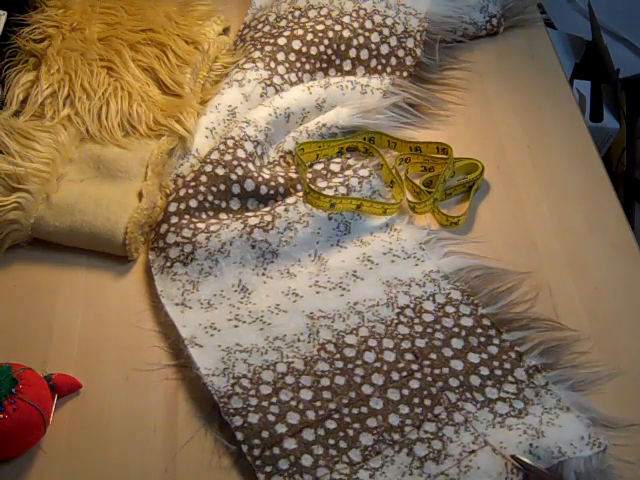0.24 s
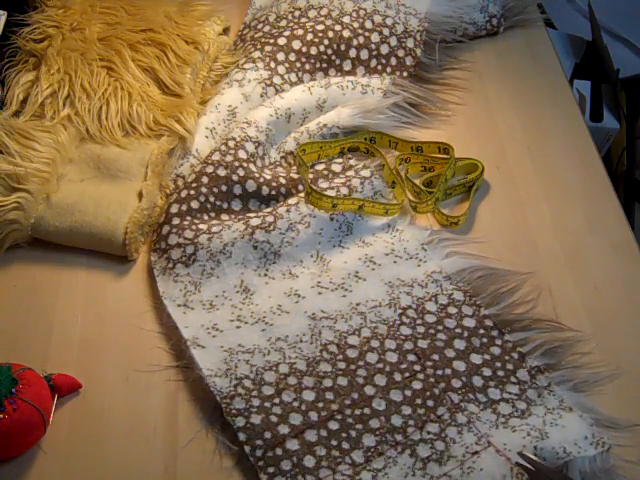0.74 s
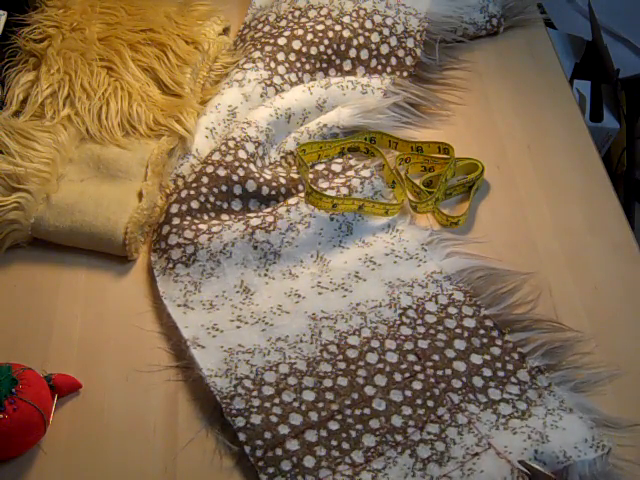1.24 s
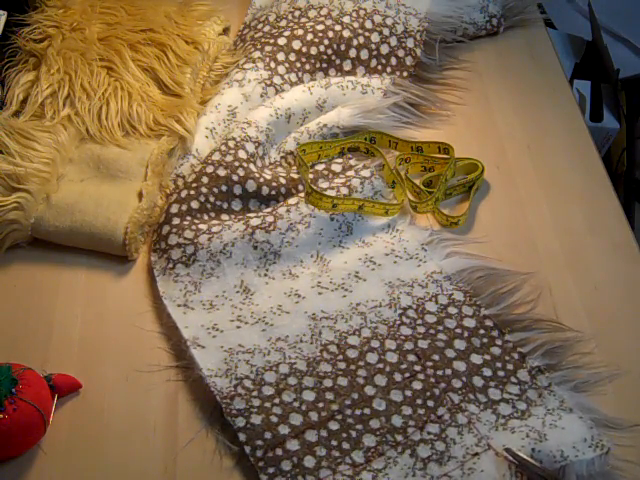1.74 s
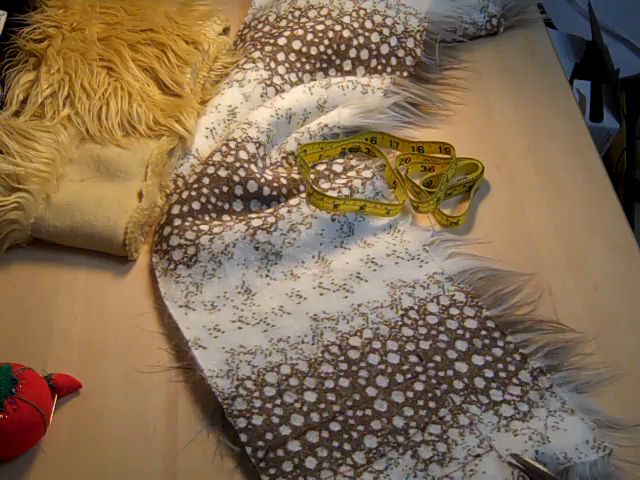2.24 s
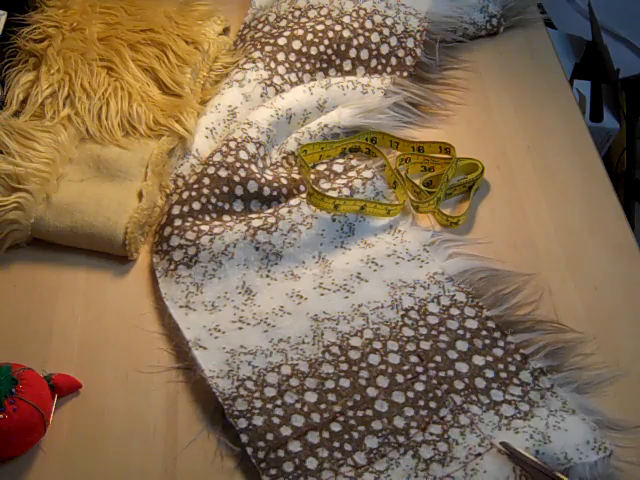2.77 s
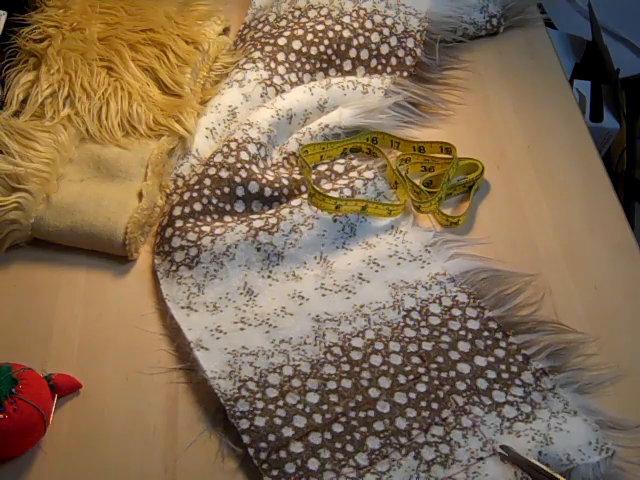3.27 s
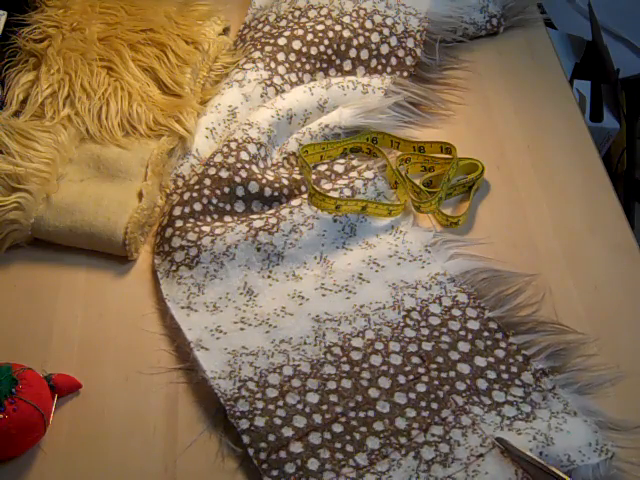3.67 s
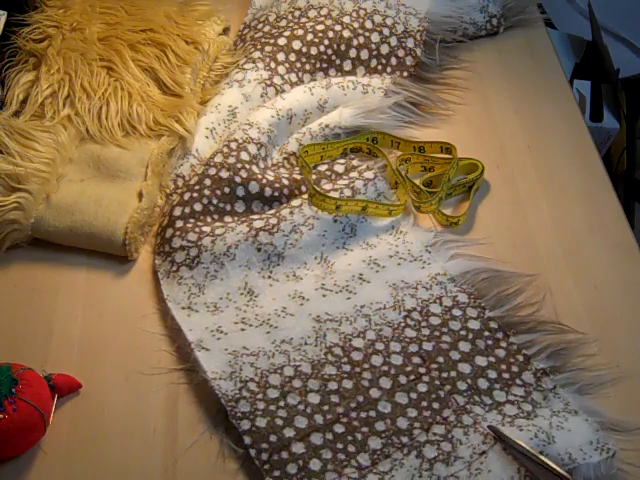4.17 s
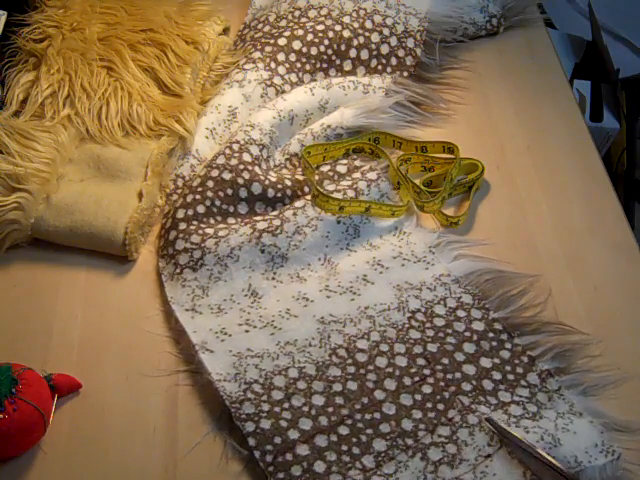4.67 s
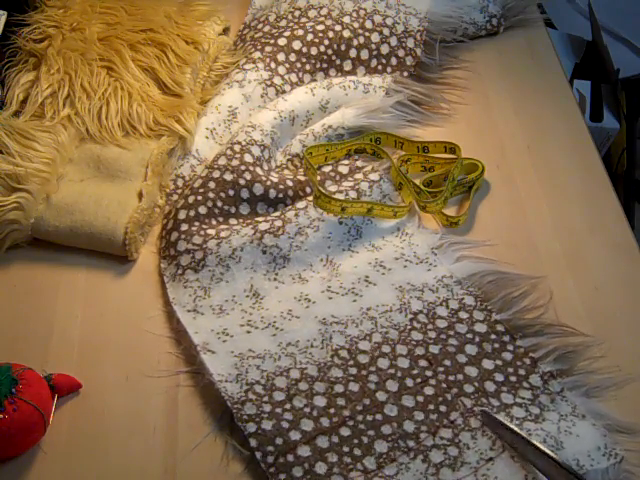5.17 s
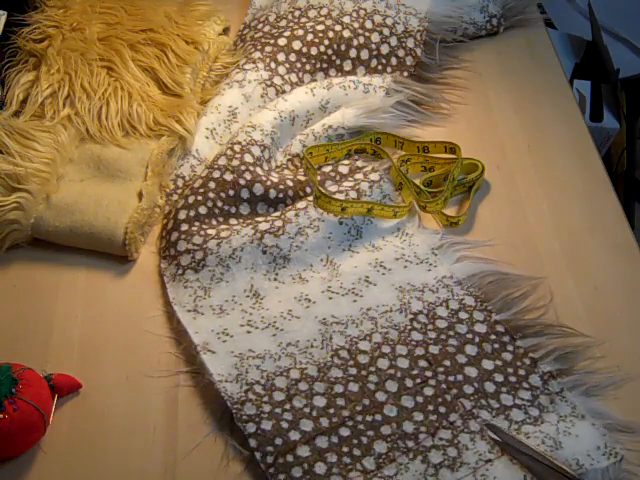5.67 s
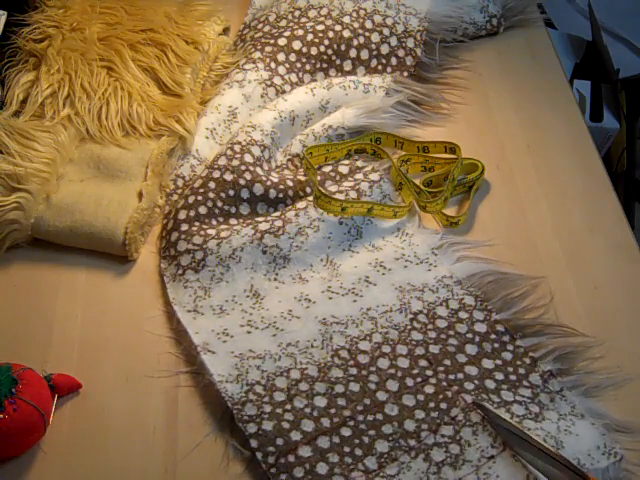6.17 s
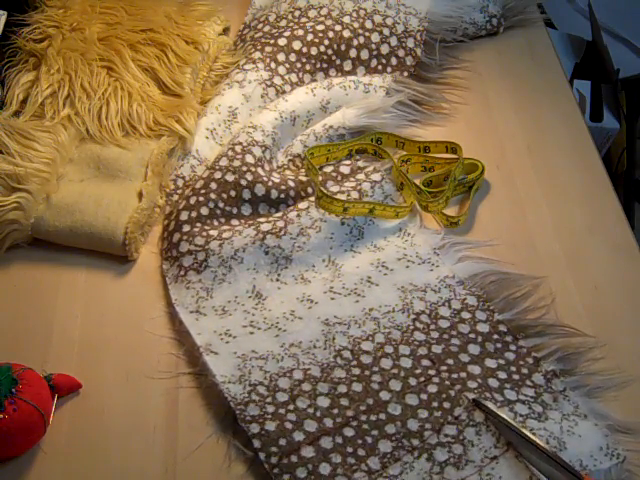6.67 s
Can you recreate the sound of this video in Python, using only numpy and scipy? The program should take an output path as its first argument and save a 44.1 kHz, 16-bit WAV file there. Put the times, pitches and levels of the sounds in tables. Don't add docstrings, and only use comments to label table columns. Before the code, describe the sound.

Scissors snip unhurriedly through thick furry fabric on a worktable, crisp bites and hard metallic closing clicks over a faint low fan hum.

```python
import sys
import numpy as np
from scipy import signal
from scipy.fft import rfft, irfft, next_fast_len
from scipy.io import wavfile
from scipy.ndimage import uniform_filter1d

SR = 44100
rng = np.random.default_rng(int(sys.argv[2]) if len(sys.argv) > 2 else 0)


def persist_wave(psi):
    counts = np.round(np.clip(psi, -1, 1) * 32767).astype(np.int16)
    wavfile.write(sys.argv[1], SR, np.atleast_2d(counts).T)


def amplitude_ratio(level_db):
    exponent = np.asarray(level_db, float) / 20
    return 10 ** exponent


N = 304686
PAD = next_fast_len(N + SR // 2)
HZ = np.maximum(np.arange(PAD // 2 + 1) * SR / PAD, 1)

# pitch_hz, rms_db, left_re_right_db
FAN_LINES = [(55, -64.5, -1), (72.7, -56, -0.5), (115.9, -60.5, 0.5), (119.1, -66.5, 3.5), (465.9, -60, -1)]
# pitch_hz, width_hz, level_db
ROOM_MODES = [(32, 23, -10.5), (101, 30, -10.5), (174, 13, -1.5), (204.4, 16, 0), (226, 17, -2.5),
              (308, 33, -2), (431.5, 41, -4.5), (460.7, 11, -0.5), (496, 23, -4), (560, 20, -20.5)]
# frequency_hz, density_db
RUMBLE_SPECTRUM = [(20, -42.5), (60, -7), (210, -9.5), (255, -15.5), (320, -8), (750, -15), (9000, -38.5),
                   (11700, -72)]
# frequency_hz, correlation
PORT_LIKENESS = [(60, 0.42), (180, 0.85), (540, 0.87), (1630, 0.083), (4890, 0.49), (14700, -0.04)]
# frequency_hz, left_re_right_db
PORT_TILT = [(60, 4.5), (180, 0), (540, 1), (1630, 2.5), (4890, 5.5), (14700, 2.5)]
RUMBLE_DB, ROOM_MODES_DB, AIR_DB, HISS_DB = -53.5, -47, -75.5, -64
# pitch_hz, width_hz, rms_db
WHINES = [(4800, 100, -79), (7960, 49, -80)]

# frequency_hz, t60_s
ROOM_T60 = [(1000, 0.17), (2700, 0.27), (4200, 0.2), (6500, 0.31), (9500, 0.18), (14000, 0.45)]
ROOM_GAP_S, ROOM_RISE_S = 0.0048, 0.0014
MOVES_S = [0, 1.3, 2.8, 4.0, 4.45, 4.95, 6.0, 7]
# peak_hz, peak_width_hz, dip_hz, dip_width_hz
LEFT_PORT = (7850, 900, 6500, 2380)
RIGHT_PORT = (6220, 972, 12500, 8600)
# peak_hz, peak_width_hz, dip_hz, dip_width_hz
LEFT_AROUND = (8270, 1803, 5470, 5910)
RIGHT_AROUND = (6220, 930, 13000, 9000)
LEFT_LAG_S, LEFT_LAG_AROUND_S = 7e-5, 6e-5

# centre_s, length_ms, level_db
PUSHES = [(.24, 170, -68.5), (.455, 23, -63), (1.68, 60, -75.5), (1.955, 52, -64.5), (2.45, 37, -73.5),
          (2.955, 110, -64.5), (3.175, 20, -69), (3.625, 34, -65), (3.86, 130, -70), (4.10, 99, -64),
          (4.87, 130, -67.5), (5.80, 30, -71.5), (6.36, 180, -62.5)]
FUR_REST_DB = -71.5
# pitch_hz, width_hz, level_db
FUR_MODES = [(3460, 1800, -1), (7200, 1800, -2), (12000, 4300, -16)]
# start_s, level_db, pitch_hz, decay_ms
KNOCKS = [
    (.5975, -40, 1100, 3),
    (0.765, -52, 1400, 12),
    (2.1055, -38.5, 820, 3),
    (2.275, -57, 1380, 14),
    (3.207, -39, 650, 10),
    (4.381, -49, 3700, 11),
    (4.585, -40, 650, 11),
    (5.140, -40, 650, 11),
    (5.2, -31, 2150, 7),
]
# centre_s, length_ms, level_db
OPENINGS = [
    (0.78, 21, -38.5),
    (2.277, 17, -38.5),
    (3.431, 20, -43.5),
    (4.775, 37, -49),
    (5.365, 22, -39),
]
# pitch_hz, width_hz, level_db
SLIDE_MODES = [(1390, 350, -4.5), (2560, 740, -0.5), (3870, 990, 3.5), (5600, 2400, -2), (7290, 670, 2),
               (9000, 510, -0.5), (10400, 810, -1.5), (12650, 1800, -9.5)]
# tips_touch_s, tip_db, handles_after_ms, handle_db, bounce_db
CLOSINGS = [
    (0.5967, -4, 0.38, -3, -15),
    (2.1047, -6, 0.69, 0.5, -8.5),
    (3.2446, -5.5, 1.2, -4.5, -13),
    (5.199, -5, 0.89, -3, -13),
]
# pitch_hz, width_hz, level_db
HANDLE_MODES = [(1140, 530, -17.5), (2000, 90, -17), (2760, 350, -6), (3850, 500, -15.5), (4480, 530, -6),
                (6740, 2200, 0.5), (8000, 980, -4), (8540, 1100, -11), (8600, 420, -21.5),
                (9610, 2200, -16.5), (11700, 1200, -17.5), (13100, 1100, -19.5)]
# pitch_hz, width_hz, level_db
HANDLE_MODES_AROUND = [(1298, 830, -20), (2750, 340, -1), (4840, 1400, -5), (6400, 1800, -2.5),
                       (7800, 1300, -4), (10800, 2900, -24), (12800, 2200, -22.5)]

# centre_s, length_ms, edge_db, body_db
FIRST_BITES = [
    (0.558, 7, -15, -28.5),
    (2.0566, 4.4, -15, -26),
    (3.206, 7.2, -11.5, -30),
    (4.5863, 7.2, -13, -25),
    (5.140, 6, -11.5, -26),
    (6.7436, 7.8, -17, -28.5),
]
DRAG_AFTER_S, DRAG_MS, DRAG_EDGE_DB, DRAG_BODY_DB = 0.0135, 11.5, -13, -9
# centre_s, length_ms, edge_db, body_db
BITES = [(0.5545, 2.2, -19, -35), (0.5628, 2.8, -13, -30), (0.591, 8, -26.5, -37),
         (2.0535, 5.4, -15, -30.5), (2.0625, 1.7, -12, -33), (2.0832, 4.6, -17, -30.5),
         (2.099, 8.4, -29, -36), (3.2113, 1, -8.5, -18), (3.2376, 8.6, -17, -23.5), (4.2902, 2.3, -31, -34),
         (4.349, 3.5, -20, -35), (4.3802, 3.5, -18, -34.5), (4.537, 5, -20, -31.5), (4.5825, 1, -14, -23),
         (4.6045, 4, -24, -58), (4.6342, 3.5, -17.5, -27), (4.6418, 2.4, -33, -48),
         (5.1348, 1.4, -15.5, -36), (5.1672, 6.4, -9, -24), (5.184, 2.5, -21, -26.5),
         (6.7063, 4.3, -26, -37), (6.7632, 3.2, -11, -28.5)]
# time_s, edge_db
THREADS = [(0.577, -23), (0.5867, -34), (2.0954, -24.5), (3.2172, -24), (4.397, -41.5), (4.5531, -39),
           (4.6257, -37.5), (5.127, -36), (5.196, -17), (6.7017, -40), (6.7546, -33), (6.757, -31),
           (6.7687, -32), (6.782, -32), (6.789, -35)]
THREAD_MS, THREAD_BODY_DB = 1.1, -10
CATCH_BEFORE_S, CATCH_EDGE_DB, CATCH_BODY_DB = 0.014, -7, -11
# time_s, edge_db, body_re_edge_db
TICKS = [(0.06, -50, -4), (0.4465, -39, -5.5), (1.2794, -49.5, -11.5), (1.6711, -41.5, -15.5),
         (1.7903, -48, -10.5), (1.953, -41, -15.5), (2.4511, -46.5, -15), (3.147, -52, -2.5),
         (3.1732, -36, -10.5), (3.632, -44, -17), (3.8342, -49, -12), (3.948, -60, 4), (5.0835, -58.5, 17),
         (5.0905, -53.5, 4), (5.7994, -56, -5), (6.1085, -43, -16.5), (6.2444, -57, -6), (6.2687, -50, -10),
         (6.627, -55, 0), (6.652, -48, -8)]
# pitch_hz, width_hz, level_db
EDGE_MODES = [(7660, 1200, -9.5), (8325, 300, 4), (9730, 1100, -6), (11700, 1800, -13), (13200, 2200, -17)]
# pitch_hz, width_hz, level_db
BODY_MODES = [(1450, 850, -17.5), (2130, 400, -9), (2930, 400, -5.5), (3440, 290, -3), (4116, 220, 5),
              (4860, 520, -1.5), (5105, 600, -4), (6200, 1000, -10.5), (6930, 1000, -12.5)]
TIPWARD = [0.42, -0.26, .1, 1.3, .3, 1.1, .5]
TIP_GAIN_DB = [-1.5, 2, 2.5, 3, -2.5, 3, 2.5, 0, -0.3]


def at_hz(points):
    hz, value = np.array(points).T
    return np.interp(np.log(HZ), np.log(hz), value)


def through(x, response):
    return irfft(rfft(x, PAD) * response, PAD)[..., :N]


def rms_one(x):
    return x / np.sqrt(np.mean(x ** 2) + 1e-20)


def resonances(modes):
    h = 0
    for k, (hz, width, db) in enumerate(modes):
        damping = 1j * HZ * width
        h = h + (-1) ** k * amplitude_ratio(db) * damping / (hz ** 2 - HZ ** 2 + damping)
    return h / np.sqrt(np.mean(abs(h) ** 2))


def humps(rows, steep):
    out, t = np.zeros(N), np.arange(N) / SR
    for s, ms, db in rows:
        near = slice(max(int((s - ms / 400) * SR), 0), int((s + ms / 400) * SR))
        distance = abs((t[near] - s) / (ms / 2000))
        out[near] += amplitude_ratio(db) * np.exp(-np.log(2) * distance ** steep)
    return out


def grains(per_s, spread_db):
    size = amplitude_ratio(spread_db * np.minimum(rng.exponential(1, N), 4))
    return rms_one(size * rng.choice([-1, 1], N) * (rng.random(N) < per_s / SR))


def evened(x, share):
    power = uniform_filter1d(uniform_filter1d(x ** 2, size=30), size=30)
    return rms_one(x / (power + 0.00073) ** (np.clip(share, 0, 1) / 2))


def electronics():
    whine = sum(amplitude_ratio(db) * resonances([(hz, width, 0)]) for hz, width, db in WHINES)
    return through(rng.standard_normal((2, N)), amplitude_ratio(HISS_DB) + whine)


def fan():
    t, lines = np.arange(N) / SR, 0
    for hz, db, pan in FAN_LINES:
        balance = amplitude_ratio([[pan / 2], [-pan / 2]])
        lines = lines + amplitude_ratio(db) * np.sqrt(2) * balance * np.sin(2 * np.pi * (hz * t + rng.random()))
    alike = np.clip(at_hz(PORT_LIKENESS), 0, 0.99)
    lean = amplitude_ratio(at_hz(PORT_TILT) / 2)
    mid, side = rfft(rng.standard_normal((2, PAD)))
    pair = np.sqrt(1 + alike) * mid + np.sqrt(1 - alike) * side * [[1], [-1]]
    pair = pair * [lean * np.exp(-2j * np.pi * HZ * 6e-5), 1 / lean] / np.sqrt(2)
    broad = amplitude_ratio(at_hz(RUMBLE_SPECTRUM))
    rumble = amplitude_ratio(RUMBLE_DB) * broad / np.sqrt(np.mean(broad ** 2))
    standing = amplitude_ratio(ROOM_MODES_DB) * abs(resonances(ROOM_MODES)) ** 1.565 / 8
    return lines + irfft(pair * np.hypot(rumble, standing), PAD)[:, :N]


def room(x, gap_s, wall_s, wall_db):
    t = np.arange(round(0.4 * SR)) / SR
    hz, t60 = np.array(ROOM_T60).T
    edges, tails = np.geomspace(600, 16000, 10), 0
    common = rng.standard_normal((len(MOVES_S), 1, len(t)))
    own = rng.standard_normal((len(MOVES_S), 2, len(t)))
    for k, (low, high) in enumerate(zip(edges, edges[1:])):
        sos = signal.butter(2, [low, high], "band", fs=SR, output="sos")
        alike = np.clip(1 - low / 7000, 0, 1)
        noise = signal.sosfilt(sos, np.sqrt(alike) * common + np.sqrt(1 - alike) * own)
        decay = amplitude_ratio(-60 * t / np.interp(np.log(low * high) / 2, np.log(hz), t60))
        tails = tails + (-1) ** k * amplitude_ratio(-2.0) * noise * decay
    onset = 1 / (1 + np.exp(-(t - gap_s) / ROOM_RISE_S))
    walls = amplitude_ratio(wall_db) * np.exp(-((t - wall_s) / 0.0063) ** 2)
    shape = onset * (1 + walls + amplitude_ratio(-3) * np.exp(-t / 0.017))
    out = np.zeros((2, N + len(t)))
    for start, end, tail in zip(MOVES_S, MOVES_S[1:], tails):
        first = int(start * SR)
        wet = signal.fftconvolve(x[None, first:int(end * SR)], tail * shape, axes=1)
        out[:, first:first + wet.shape[1]] += wet
    return out[:, :N]


def ports(x, left, right, lag_s):
    def port(peak_hz, peak_width, dip_hz, dip_width):
        dip = 1 - (HZ / dip_hz) ** 2 + 1j * HZ * dip_width / dip_hz ** 2
        peak = 1 - (HZ / peak_hz) ** 2 + 1j * HZ * peak_width / peak_hz ** 2
        return dip / peak
    lag = np.exp(-2j * np.pi * HZ * lag_s)
    return through(x, np.array([port(*left) * lag, port(*right)]))


def rustling():
    level = amplitude_ratio(-8.5) * (amplitude_ratio(FUR_REST_DB) + humps(PUSHES, steep=1.8))
    fibres = np.array([grains(9000.0, spread_db=5.5), grains(9000.0, spread_db=4.5)])
    return through(level * fibres, resonances(FUR_MODES))


def knocking():
    out, t = np.zeros(N), np.arange(round(0.06 * SR)) / SR
    for s, db, hz, ms in KNOCKS:
        envelope = (1 - np.exp(-t / 0.00095)) * np.exp(-1000 * t / ms)
        out[round(s * SR):][:len(t)] += amplitude_ratio(db) * np.sin(2 * np.pi * hz * t) * envelope
    return out


def sliding():
    rub = grains(11000.0, spread_db=2.5) * humps(OPENINGS, steep=1.44)
    return amplitude_ratio(-8) * through(rub, resonances(SLIDE_MODES))


def slamming():
    clicks = np.zeros((2, N))
    for s, tip_db, ms, hit_db, bounce_db in CLOSINGS:
        meet_s = s + ms / 1000
        clicks[:, round(meet_s * SR)] = amplitude_ratio(hit_db)
        clicks[0, round((meet_s + 0.0021) * SR)] = -amplitude_ratio(bounce_db + 1.0)
    colours = np.array([resonances(HANDLE_MODES), resonances(HANDLE_MODES_AROUND)])
    return amplitude_ratio(5) * through(clicks, colours)


def blade_body(threads):
    place = np.searchsorted(np.array(MOVES_S) * SR, np.arange(N), "right") - 1
    favour = amplitude_ratio(np.outer(TIP_GAIN_DB, TIPWARD))
    modes = [(-1) ** k * amplitude_ratio(db) * np.sqrt(width) * resonances([(hz, width, 0)])
             for k, (hz, width, db) in enumerate(BODY_MODES)]
    return rms_one(np.sum(through(threads, np.array(modes)) * favour[:, place], axis=0))


def ripping():
    ticks = [(s + 0.0015, 2.2, db, db + rel) for s, db, rel in TICKS]
    tips = [(s, 1.4, db + 4.5, db - 17.5) for s, db, *_ in CLOSINGS]
    drags = [(s + DRAG_AFTER_S, DRAG_MS, edge_db + DRAG_EDGE_DB + 10 * np.log10(ms / DRAG_MS),
              body_db + DRAG_BODY_DB) for s, ms, edge_db, body_db in FIRST_BITES]
    single = [(s, THREAD_MS, db, db + THREAD_BODY_DB) for s, db in THREADS]
    catches = [(s - CATCH_BEFORE_S, 2.2, db + CATCH_EDGE_DB, db + CATCH_BODY_DB) for s, ms, db in OPENINGS]
    rows = np.array(list(FIRST_BITES) + list(BITES) + drags + single + catches + ticks + tips)
    threads = grains(12000.0, spread_db=7.0)
    edge = evened(through(threads, resonances(EDGE_MODES)), share=0.8)
    edge = edge * humps(rows[:, [0, 1, 2]], steep=2.4)
    body = evened(blade_body(threads), share=0.35) * humps(rows[:, [0, 1, 3]], steep=1.8)
    return amplitude_ratio(-18.5) * edge, amplitude_ratio(-4.0) * body


def scene():
    edge, body = ripping()
    slam, slam_around = slamming()
    slide = sliding()
    to_walls = amplitude_ratio(-45) * edge + amplitude_ratio(-39) * body + amplitude_ratio(-40) * slam_around + amplitude_ratio(-43) * slide
    echoes = room(to_walls, gap_s=ROOM_GAP_S, wall_s=0.0076, wall_db=2.5)
    air = amplitude_ratio(AIR_DB) * rng.standard_normal((2, N))
    near = edge + body + slam + slide + knocking() + air
    direct = ports(near, LEFT_PORT, RIGHT_PORT, LEFT_LAG_S)
    around = ports(echoes + rustling(), LEFT_AROUND, RIGHT_AROUND, LEFT_LAG_AROUND_S)
    return direct + around + fan()


def top_cut(x):
    return signal.sosfilt(signal.butter(12, 15310, fs=SR, output="sos"), x)


def record(dry):
    steep = signal.ellip(8, 0.5, 38, 14250, fs=SR, output="sos")
    last = signal.ellip(4, 0.3, 14, 15200, fs=SR, output="sos")
    clipped = np.clip(signal.sosfilt(steep, dry + electronics()), -1, 1)
    return top_cut(signal.sosfilt(last, clipped))


dry = scene()
out = record(dry)
persist_wave(out)
```